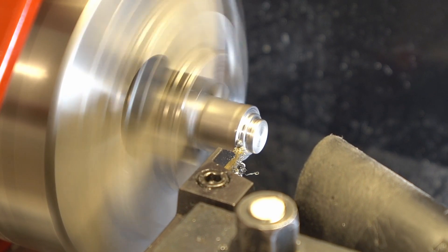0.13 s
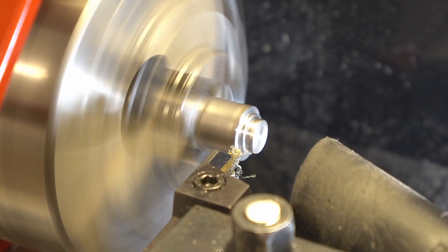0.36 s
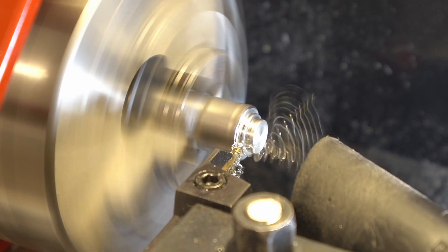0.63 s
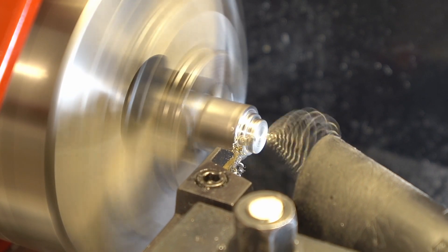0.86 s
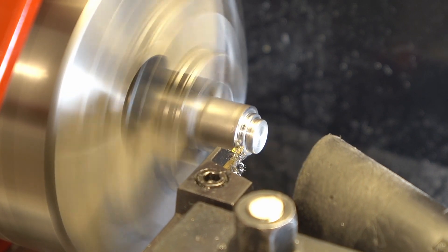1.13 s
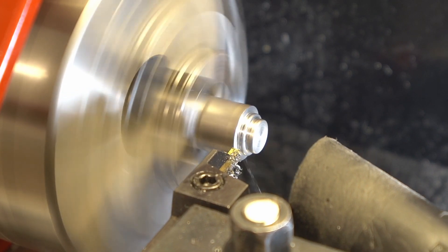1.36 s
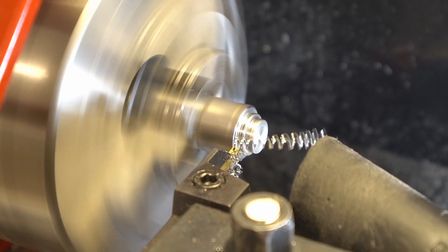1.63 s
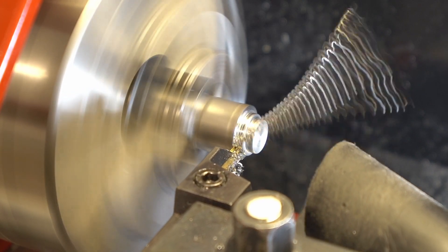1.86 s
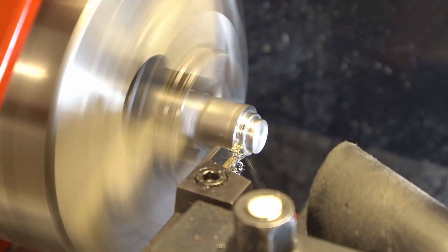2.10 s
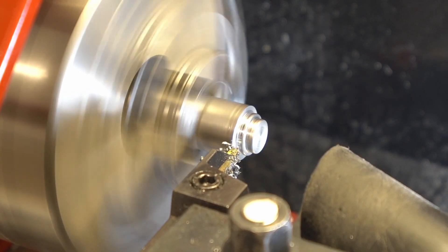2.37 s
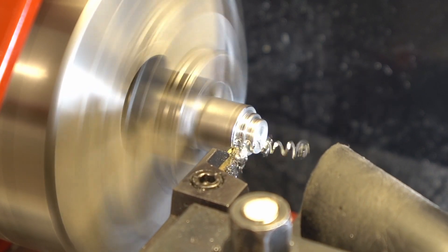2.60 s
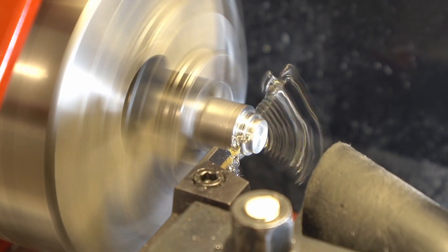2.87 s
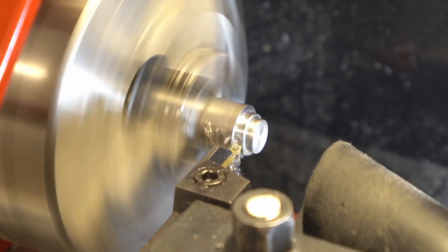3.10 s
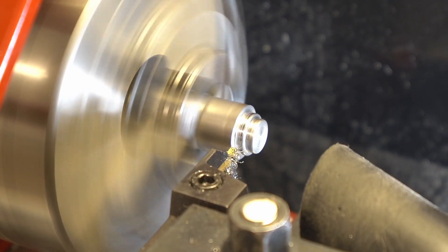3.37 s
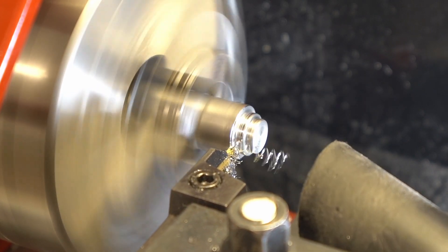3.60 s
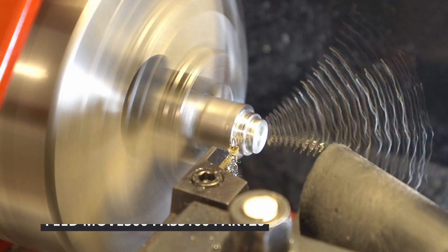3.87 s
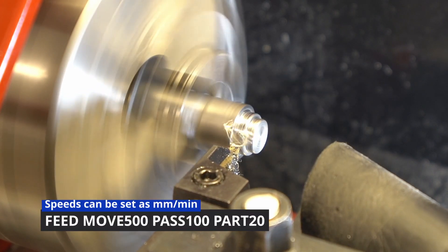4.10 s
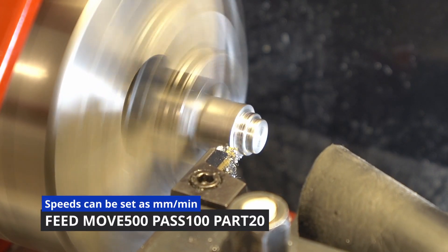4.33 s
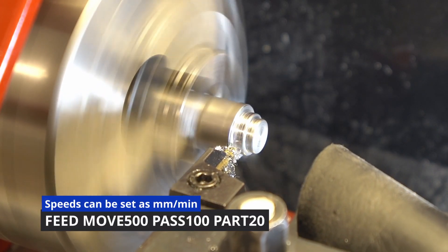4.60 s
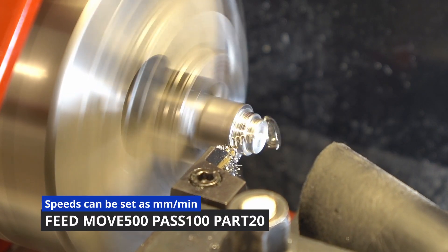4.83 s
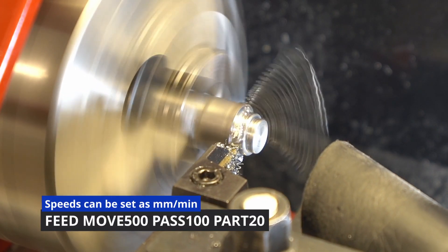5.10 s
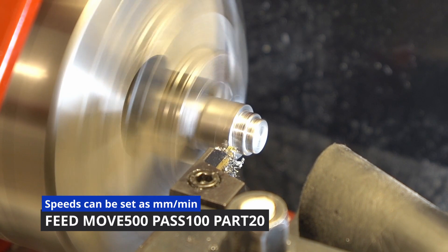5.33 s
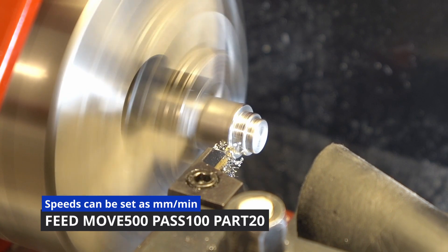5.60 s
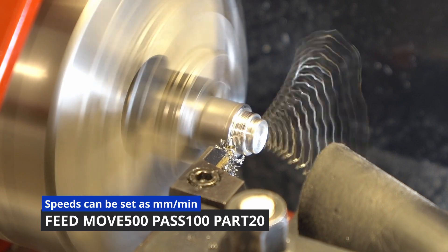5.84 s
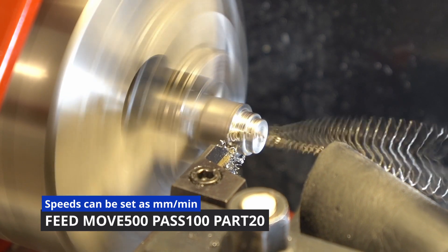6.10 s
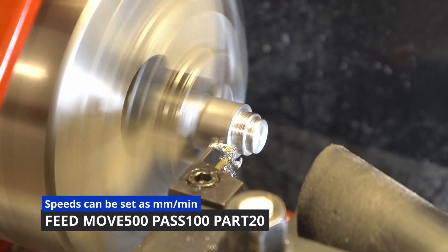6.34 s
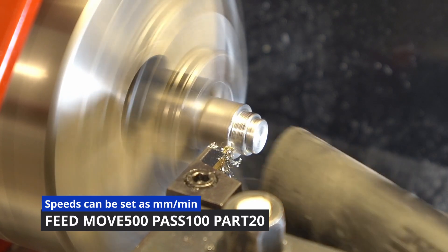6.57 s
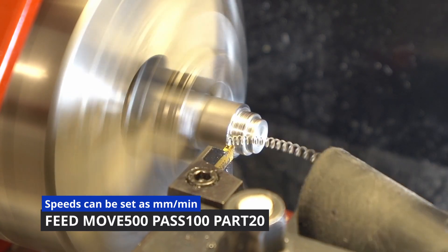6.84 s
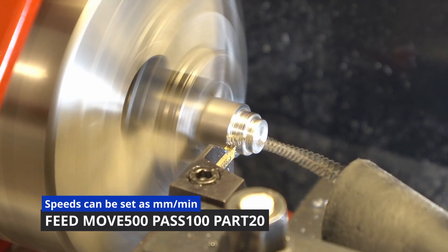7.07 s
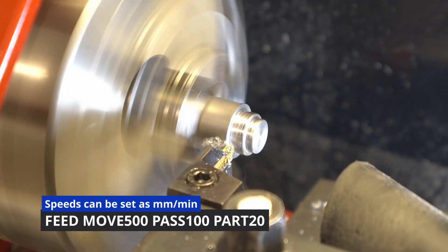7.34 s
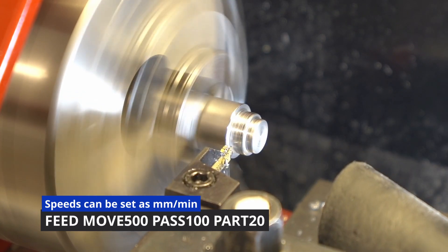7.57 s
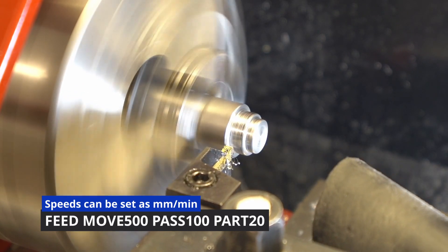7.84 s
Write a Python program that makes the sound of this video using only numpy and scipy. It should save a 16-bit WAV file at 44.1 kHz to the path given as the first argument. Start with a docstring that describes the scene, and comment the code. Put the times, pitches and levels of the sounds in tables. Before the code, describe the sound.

For nearly eight seconds a small metal lathe runs without pause, close up and in stereo. A dense, bright roar of suction air and bearings fills the scene, strongest in the upper middle range, with fine swarf rustling over it. A motor whine near 2.5 kHz and a thin steady squeal near 8 kHz sit inside, stronger on the right. A cut already under way ends at once; new bites come around 0.5, 1.5, 2.6, 3.6, 4.6, 5.6 and 6.6 seconds, with another starting lightly near 7.6. Each brings a faint rough feed blip, a quick pitch sag and a coarse low-mid hum for about 0.6 seconds, then a brief upward leap. Dull slide knocks follow some passes, near 2.1, 3.1, 4.2, 6.2 and 7.2. Chips hiss softly at 1.1, 1.8 and 6.3; around 6.7 the nozzle is partly blocked, giving a short hollow rush.

```python
"""A steady roar of air and bearings comes first, with a whining motor in it: a small metal lathe near a vacuum nozzle.
The roar is noise shaped by the frame's resonances; swarf rustles over it, and long chips hiss into the nozzle.
The feed motor blips on a rough sine and the slide knocks with short decaying partials.
Passes come about one a second: the spindle's sines sag as the tool bites and overshoot as it leaves.
The drive's switching whine carries sidebands that follow the spindle."""
import sys
import numpy as np
from scipy import signal
from scipy.fft import rfft, irfft, next_fast_len
from scipy.io import wavfile
from scipy.ndimage import uniform_filter1d, map_coordinates

SR = 44100
rng = np.random.default_rng(int(sys.argv[2]) if len(sys.argv) > 2 else 0)


def gain_from_db(level_db):
    """Turn a decibel level (scalar or array-like) into a linear amplitude factor."""
    decades = np.asarray(level_db, float) / 20
    return 10 ** decades


def bounce(signal):
    """Save signal as a 16-bit WAV file at the path given by the first command-line argument."""
    frames = np.transpose(np.atleast_2d(signal))
    limited = np.clip(frames, -1, 1)
    pcm = np.round(limited * 32767).astype(np.int16)
    wavfile.write(sys.argv[1], SR, pcm)


N = 350595

# spectrum of air and bearings ahead of the frame: freq_hz, relative density_db (per Hz)
ROAR_SPECTRUM = [(25, -49), (60, -50.5), (120, -28), (221, -23), (305, -21.5), (433, -13), (585, -9.5),
                 (760, -8.5), (1080, -8.5), (1760, -7.5), (2300, -2.5), (3010, -1), (4630, -5),
                 (7930, -10.5), (15500, -23)]
# hollow rush past a chip in the nozzle: freq_hz, relative density_db (per Hz)
HOLLOW_SPECTRUM = [(400, -120), (750, -25), (1000, -5), (1400, 0), (1900, -1), (2300, -8), (2800, -25),
                   (4000, -120)]
# hiss of swarf and chips: freq_hz, relative density_db (per Hz)
HISS_SPECTRUM = [(3000, -120), (4500, -30), (6500, -8), (8500, -1.5), (11000, -.5), (15500, 0)]
# stereo balance of the noises: freq_hz, left_minus_right_db
STEREO_LEAN = [(60, -20), (110, 3), (200, 0), (380, 0), (700, -3.5), (1290, -5), (2380, -3.5), (4400, -1),
               (8120, -9), (11000, -1), (15000, -1.5)]
# stereo likeness of the noises: freq_hz, likeness (0-1)
STEREO_LIKENESS = [(60, 0.17), (140, 0.65), (210, 0.88), (330, 0.66), (500, 0.89), (750, 0.51),
                   (1100, 0.58), (1250, 0.098), (5550, 0.038), (5700, 0.44), (6150, 1), (6250, 0.78),
                   (9500, 0.96), (12000, 0.87), (15000, 0.9)]
# resonances and notches of frame and covers: centre_hz, width_hz, left_db, right_db
FRAME_MODES = [(230, 30, 4.3, 2.6), (310, 30, -8.1, 0.5), (430, 45, 1.0, 3.0), (550, 30, 4.1, 1.1),
               (590, 30, -1.7, -4.2), (680, 50, 8.5, 9), (800, 30, 2, 2), (820, 30, -2.7, -0.2),
               (870, 30, 1.4, -2.6), (1020, 30, -1.6, 2.1), (1110, 95, 2.1, 3.8), (1210, 65, -4.7, -0.8),
               (1270, 45, -2.0, 1.7), (1330, 30, 1.3, -2.7), (1450, 30, 0.6, 2.4), (1530, 95, 3.4, -1.8),
               (1740, 65, -1.1, -2.2), (1870, 30, -2.4, -0.2), (1990, 60, -2.5, -3.8),
               (2070, 45, 1.4, -4.6), (2140, 30, -0.4, 2.7), (2190, 90, 1.5, 5.0), (2320, 300, 3.0, 1.6),
               (2350, 30, 2.2, -4.7), (2520, 100, 0.5, 1.5), (2660, 65, -2.5, 4.3), (2770, 30, 1.9, -2.9),
               (2810, 45, 6.7, -3.6), (3040, 320, 3.4, 4.4), (3120, 45, -2, 6.5), (3200, 45, -3.6, -0.1),
               (3330, 65, 2.4, -3.6), (3460, 65, -2.0, 0.4), (3560, 40, 2.0, 2.5), (3650, 45, 3.2, -3.1),
               (3770, 300, 3.5, 3.3), (3900, 45, -0.9, 5.3), (3950, 30, -1.1, 3.5), (4040, 95, -3.1, -2.9),
               (4240, 65, 2.0, -1.4), (4320, 45, 3.5, 5.3), (4420, 45, -0.1, 3.0), (4530, 95, -2.6, -0.7),
               (4880, 45, -2.4, -1.8), (4960, 30, -0.8, 4.5), (5280, 95, 0.1, 6.4), (6090, 30, 3.9, 5.9),
               (6460, 300, -2.7, -4.2), (6750, 45, 3.3, 2.3), (7020, 95, -2.2, -2.8), (7180, 40, 2, 3),
               (7680, 25, 4, 5), (8100, 95, -3.0, -1.8), (8680, 300, -0.0, -3.0), (9210, 300, 0.3, -2.6)]
# chips sucked into the nozzle: centre_s, half_length_s, added hiss_db, blocked share of the opening (0-1)
NOZZLE_CHIPS = [(.8, .04, -63, .05), (1.085, .045, -53.5, .1), (1.845, .02, -54.5, .05),
                (3.83, .05, -63, .05), (6.19, .02, -61, .05), (6.272, .02, -51, .15), (6.645, .01, -60, .4),
                (6.68, .05, -62, .33), (6.745, .055, -53.5, .4), (7.2, .04, -63, .05),
                (7.52, .02, -62, .05), (7.67, .025, -60, .05)]
# rapid moves of the feed motor: start_s, length_s, peak level_db
FEED_MOVES = [(.56, .11, -58.5), (1.58, .14, -65), (2.58, .14, -65), (3.62, .14, -65), (4.63, .14, -66),
              (5.65, .14, -66), (6.64, .14, -67)]
# slide taking up its play as the tool backs off: start_s, level_db
SLIDE_KNOCKS = [(2.1, -48), (2.135, -47), (3.11, -53), (4.165, -52), (4.2, -49), (6.228, -46), (7.2, -52),
                (7.235, -49)]
# partials of a knock: pitch_hz, relative level_db, t60_s
SLIDE_PARTIALS = [(430, -5, .11), (470, -1, .12), (505, 0, .13), (545, -1, .12), (600, -8, .08),
                  (690, -7, .08)]
# cutting passes: bite_s, leave_s, load_db, sag_hz of the pole rate at the bite
PASSES = [(-.5, .09, -1.5, 10), (.535, 1.11, 0, 10.2), (1.545, 2.14, 0, 11), (2.56, 3.15, 0, 10.4),
          (3.595, 4.21, 0, 11.1), (4.61, 5.19, -.5, 10.0), (5.625, 6.2, 0, 11.4), (6.62, 7.21, -.5, 10.1),
          (7.6, 7.8, -7, 2.2)]
# 3rd multiple under full load, coloured by the bed's resonance: pitch_hz, right_db
HUM_BY_PITCH = [(650, -59), (660, -57.5), (668, -52.5), (684, -53.5), (700, -56)]
# 11th multiple under full load, across a sharp resonance: pitch_hz, left_db, right_db
WHINE_BY_PITCH = [(2380, -67, -55), (2387, -58, -49), (2392, -51, -42), (2402, -51, -42.5),
                  (2413, -62, -52.5), (2450, -72, -55), (2488, -72, -59), (2502, -72, -49.5),
                  (2525, -68, -53), (2570, -62, -55.5)]
# 10th multiple: pitch_hz, left_db, right_db
TENTH_BY_PITCH = [(2180, -66, -56), (2240, -70, -61), (2277, -65, -56.5), (2305, -62, -62),
                  (2330, -56, -63)]
# weaker motor tones ahead of the frame: multiple of the pole rate, left_db, right_db, load share (0-1)
WEAK_TONES = [(5, -76, -72, 0.6), (6, -71, -62.5, 1), (7, -72.5, -91, 1), (8.4, -74, -67, 0.1),
              (9, -73, -72, 0.1), (10.4, -66, -70, 0.5), (12, -71, -65, 0.4), (12.4, -68, -72, 0.5),
              (14.35, -66, -70, 0.4), (15.2, -68, -63, 0.3), (16, -70, -66, 0.3), (17.2, -72, -66, 0.3),
              (18.3, -72, -65, 0.6)]
# switching tone and sidebands: multiple of the pole rate added, left_db, right_db
DRIVE_SIDEBANDS = [(-2, -74, -64.5), (-4 / 3, -80, -71), (-1, -72, -63), (0, -69.5, -58.5), (1, -72, -63),
                   (2, -82, -76)]


def unit(x):
    """Scales to rms 1."""
    return x / np.sqrt(np.mean(x ** 2) + 1e-20)


def along(points, hz):
    """Reads a curve of (freq_hz, value) points on a log frequency axis."""
    freq_hz, value = np.transpose(points)
    return np.interp(np.log(hz + 1), np.log(freq_hz + 1), value)


def wobble(rate):
    """A smooth random curve with rate knots a second."""
    knots = rng.standard_normal(int(N * rate / SR) + 4)
    return map_coordinates(knots, [np.arange(N) * rate / SR])


def filtered(x, response):
    """Applies a gain given as a function of frequency."""
    size = next_fast_len(N + SR // 2)
    spectrum = rfft(x, size) * response(np.fft.rfftfreq(size, 1 / SR))
    return irfft(spectrum, size)[..., :N]


def frame(hz):
    """Gain of the frame's resonances and notches towards the left and right side."""
    total_db = 0
    for centre_hz, width_hz, left_db, right_db in FRAME_MODES:
        peak_db = np.array([[left_db], [right_db]])
        total_db = total_db + peak_db / (1 + (2 * (hz - centre_hz) / width_hz) ** 2)
    return gain_from_db(total_db)


def stereo_noise(spectrum, patchy_db):
    """Shaped noise of rms 1, partly alike on both sides, with random gain patches in time and pitch."""
    cells = signal.stft(rng.standard_normal((2, N)), nperseg=512)[2]
    field = uniform_filter1d(rng.standard_normal(cells.shape[1:]), size=8, axis=0)
    field = uniform_filter1d(field, size=5, axis=1)
    pair = signal.istft(cells * gain_from_db(patchy_db * unit(field)), nperseg=512)[1][:, :N]

    def mid_side(hz):
        angle = np.arccos(np.clip(along(STEREO_LIKENESS, hz), 0, 1)) / 2
        return gain_from_db(along(spectrum, hz)) * [np.cos(angle), np.sin(angle)]

    def lean(hz):
        return gain_from_db(along(STEREO_LEAN, hz) * np.array([[.5], [-.5]]))

    mid, side = filtered(pair, mid_side)
    return unit(filtered(np.array([mid + side, mid - side]), lean))


def swell(centre_s, half_length_s):
    """Sample positions and bell-shaped envelope of one event."""
    half = int(half_length_s * SR)
    centre = round(centre_s * SR)
    at = np.arange(max(centre - half, 0), min(centre + half, N))
    return at, np.cos(np.pi / 2 * (at - centre_s * SR) / half) ** 2


def bursts(sizes):
    """Sums one bell-shaped swell per chip, each of its given size."""
    out = np.zeros(N)
    for (centre_s, half_length_s, *_), size in zip(NOZZLE_CHIPS, sizes):
        at, bell = swell(centre_s, half_length_s)
        out[at] += size * bell
    return out


def roar():
    """Suction air and bearings ring the frame; a chip in the nozzle mutes the jet's band and adds a hollow rush."""
    roar_db, hollow_db = -42.5, -42.5
    ripple = rng.standard_normal((2, 500))  # nearby walls comb each side's spectrum finely

    def walls(hz):
        comb = np.array([np.interp(hz / 22, np.arange(500), side) for side in ripple])  # a knot every 22 Hz
        return gain_from_db(1.4 * comb / (1 + (hz / 9000) ** 4))

    air = stereo_noise(ROAR_SPECTRUM, patchy_db=0.45)
    noise = unit(filtered(air, lambda hz: frame(hz) * walls(hz)))
    jet = filtered(noise, lambda hz: np.exp(-((hz - 3400) / 900) ** 2))
    treble = filtered(noise, lambda hz: 1 / (1 + (4500 / (hz + 1)) ** 4))
    blocked = np.clip(bursts(np.transpose(NOZZLE_CHIPS)[3]), 0, 1)
    flutter = gain_from_db(.6 * wobble(22) + .5 * wobble(40)) - 1  # the treble flutters more than the body
    sway_db = .06 * wobble(3) + .3 * wobble(20)
    steady = gain_from_db(roar_db + sway_db) * (noise - blocked * jet + flutter * treble)
    hollow = stereo_noise(HOLLOW_SPECTRUM, patchy_db=.5)
    return steady + gain_from_db(hollow_db) * blocked * hollow


def chips():
    """Loose swarf rustles all the time; long chips add bursts of grainy hiss."""
    rustle = gain_from_db(-64 + .6 * wobble(10) + 2.1 * wobble(28))
    gain = rustle + bursts(gain_from_db(np.transpose(NOZZLE_CHIPS)[2]))
    grain = gain_from_db(2.2 * wobble(250))  # the coils scrape one after another
    hiss = unit(grain * stereo_noise(HISS_SPECTRUM, patchy_db=1.5))
    return gain * hiss * gain_from_db([[-1.5], [0]])  # left a little softer


def knock():
    """One dull knock of the slide: decaying sines with random phases and a soft onset."""
    t = np.arange(SR // 5) / SR
    ring = np.zeros(len(t))
    for pitch_hz, level_db, t60_s in SLIDE_PARTIALS:
        decay = gain_from_db(level_db + rng.normal(0, 2) - 60 * t / t60_s)
        ring += decay * np.sin(2 * np.pi * pitch_hz * t + rng.uniform(0, 2 * np.pi))
    return ring * (1 - np.exp(-t / .012))


def feed():
    """The feed motor's rapid moves are short rough tones; the slide knocks as it takes up its play."""
    feed_hz = 541
    out = np.zeros(N + SR)
    rough = gain_from_db(1.8 * wobble(60))
    for start_s, length_s, level_db in FEED_MOVES:
        at, bell = swell(start_s + length_s / 2, length_s * .7)  # the soft ends spill past the move
        out[at] += gain_from_db(level_db) * bell * rough[at] * np.sin(2 * np.pi * feed_hz * at / SR)
    for start_s, level_db in SLIDE_KNOCKS:
        ring, start = knock(), round(start_s * SR)
        span = slice(start, start + len(ring))
        out[span] += gain_from_db(level_db) * ring * rough[span]
    return out[:N]


def cutting_load():
    """Load in dB: builds within a few hundredths of a second at the bite, drops to idle as the tool leaves."""
    idle_db = -9.5
    load = np.zeros(N)
    for bite_s, leave_s, load_db, _ in PASSES:
        load[max(round(bite_s * SR), 0):round(leave_s * SR)] = gain_from_db(load_db)
    smooth = uniform_filter1d(load, size=SR // 12)
    return 20 * np.log10(np.maximum(smooth, gain_from_db(idle_db)))


def pole_rate():
    """The speed regulator's answer in Hz: a sag at each bite, end swings growing with the load squared."""
    set_hz, hunt_hz = 227.7, .2  # the regulator hunts a little around its set rate
    sag_lead_s, sag_s = .03, .091  # starts before full bite; time to the lowest point
    strain_hz, strain_lead_s, strain_s = 3.8, .12, .05  # dip at the shoulder, before the tool leaves
    leap_hz, leap_lead_s, leap_s = 6.3, .05, .072  # overshoot as the load comes off
    coast_hz, coast_s, coast_edge_s = 2.8, .32, .032  # runs fast until the regulator catches it
    t = np.arange(N) / SR

    def swing(start_s, rise_s):
        u = np.maximum(t - start_s, 0) / rise_s
        return (u * np.exp(1 - u)) ** 2  # peaks at 1 after rise_s

    def step(at_s):
        return .5 + .5 * np.tanh((t - at_s) / (2 * coast_edge_s))

    rate_hz = set_hz + hunt_hz * wobble(9)
    for bite_s, leave_s, load_db, sag_hz in PASSES:
        strain = strain_hz * swing(leave_s - strain_lead_s, strain_s)
        leap = leap_hz * swing(leave_s - leap_lead_s, leap_s)
        coast = coast_hz * (step(leave_s + leap_s) - step(leave_s + coast_s))
        sag = sag_hz * swing(bite_s - sag_lead_s, sag_s)
        rate_hz = rate_hz + gain_from_db(2 * load_db) * (leap + coast - strain) - sag
    return rate_hz


def spindle():
    """Sines on multiples of the pole rate, and the switching tone with sidebands that follow it."""
    pole_hz = pole_rate()
    turn = 2 * np.pi * np.cumsum(pole_hz) / SR
    load_db = cutting_load()

    def tone(phase, unsteady):
        return np.sqrt(2) * np.sin(phase + unsteady * wobble(25))  # rms 1

    def by_pitch(multiple, table):
        pitch_hz, *sides = np.transpose(table)
        return np.array([np.interp(multiple * pole_hz, pitch_hz, side_db) for side_db in sides])

    hum_db = by_pitch(3, HUM_BY_PITCH) + load_db + [[-3], [0]]  # left 3 dB softer
    hum_db = hum_db + .3 * wobble(8) + .7 * wobble(20) + 1.6 * wobble(45)
    hum = gain_from_db(hum_db) * tone(3 * turn, .3)

    # the resonance steadies the whine at the bottom of the sag
    ragged = np.clip((pole_hz - 219) / 6, .25, 1)
    whine_db = by_pitch(11, WHINE_BY_PITCH) + .3 * load_db
    whine_db = whine_db + ragged * (.5 * wobble(10) + 1.3 * wobble(28))
    whine = gain_from_db(whine_db) * tone(11 * turn, .45 * ragged)
    tenth_db = by_pitch(10, TENTH_BY_PITCH) + 1.5 * wobble(12) + 1.5 * wobble(28)
    tenth = gain_from_db(tenth_db) * tone(10 * turn, .4)

    weak = np.zeros((2, N))
    for multiple, left_db, right_db, share in WEAK_TONES:
        apart = rng.uniform(0, 2 * np.pi, (2, 1))  # each side is reached by its own paths
        level_db = share * load_db + 2.1 * wobble(12) + [[left_db], [right_db]]
        weak += gain_from_db(level_db) * tone(multiple * turn + apart, .37)

    carrier_hz = 7982 + 1.55 * wobble(1.5)  # switching rate of the drive, drifting slightly
    carrier = 2 * np.pi * np.cumsum(carrier_hz) / SR
    drive = np.zeros((2, N))
    for multiple, left_db, right_db in DRIVE_SIDEBANDS:
        level_db = 2 * wobble(6) + [[left_db], [right_db]]
        drive += gain_from_db(level_db) * tone(carrier + multiple * turn, .35)
    return hum + whine + tenth + filtered(weak, frame) + drive


def scene():
    """All sources, close to the microphones."""
    return roar() + chips() + feed() + spindle()


def roll_off(x):
    """The treble ends steeply here."""
    return signal.sosfilt(signal.butter(12, 15690, fs=SR, output="sos"), x)


def record(dry):
    """The finished mix as recorded."""
    return roll_off(dry)


dry = scene()
out = record(dry)
bounce(out)
```